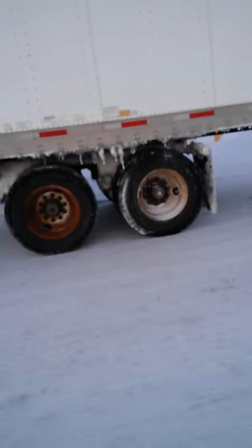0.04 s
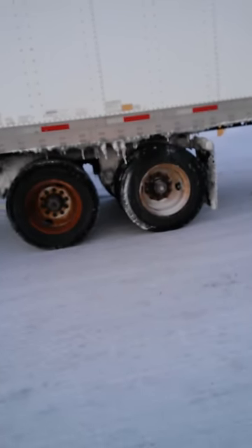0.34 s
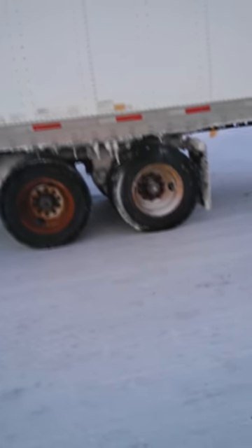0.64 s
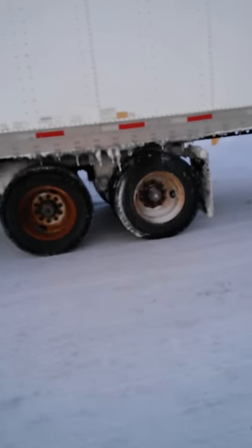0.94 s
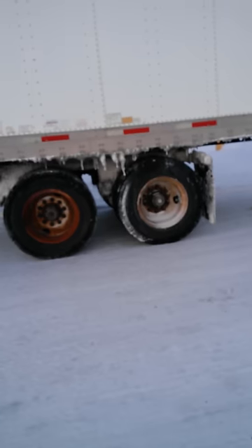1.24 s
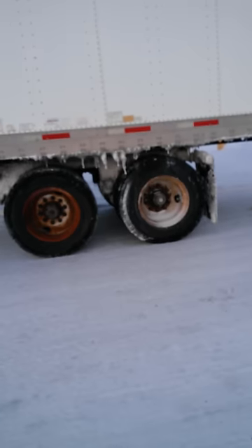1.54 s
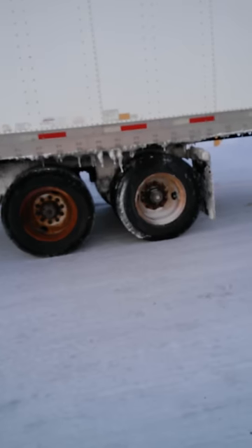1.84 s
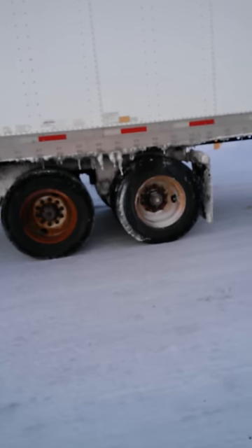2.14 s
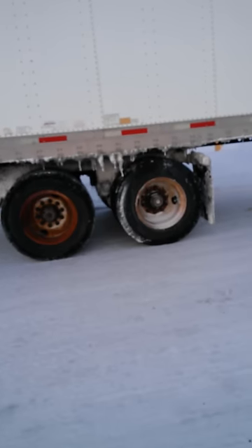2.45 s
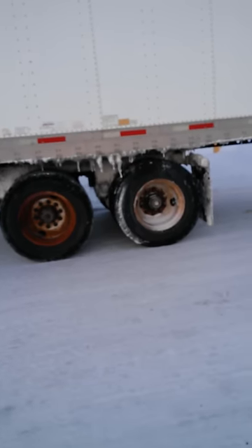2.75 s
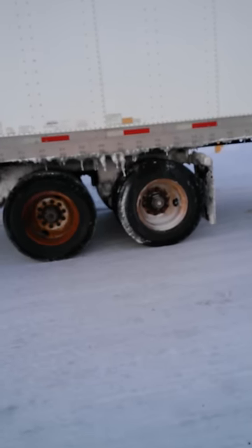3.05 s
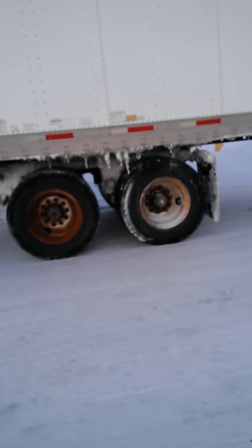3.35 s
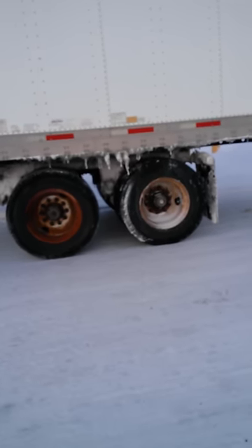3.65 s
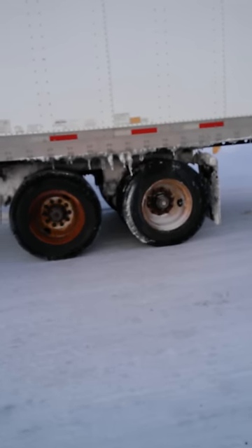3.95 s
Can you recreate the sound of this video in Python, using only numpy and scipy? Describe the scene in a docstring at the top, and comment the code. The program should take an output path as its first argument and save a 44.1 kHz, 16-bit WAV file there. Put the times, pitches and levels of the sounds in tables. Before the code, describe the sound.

Trailer tyres scrape and rumble slowly over packed snow, with a faint distant idle and a faint brake squeal. Wind buffets the microphone hard through the first second, mostly on the right. From 1 second, air hisses in swells, strongest around 2.4 to 3.1 seconds. The scraping dips, then builds, and a tyre slips twice at about 3.1 and 3.3 seconds. Gusts return from 3.4 seconds.

```python
"""A semi trailer creeps over packed snow. From the start its tyres scrape and rumble by friction, the
tractor idles far ahead and a dragging brake sings faintly. In the first second turbulent wind buffets
the two microphone ports, mostly the right, and the gain control ducks under the hardest gusts. From one
second on, a jet of air hisses in swells. Just after three seconds a tyre slips twice, shoving snow,
while the hiss changes colour; then the wind picks up again."""
import sys
import numpy as np
from scipy import signal
from scipy.fft import rfft, irfft
from scipy.io import wavfile

SR = 44100
rng = np.random.default_rng(int(sys.argv[2]) if len(sys.argv) > 2 else 0)


def store_pcm(level_fs):
    """Save levels as 16-bit WAV."""
    pcm = np.round(np.clip(level_fs, -1, 1) * 32767).astype(np.int16)
    wavfile.write(sys.argv[1], SR, np.atleast_2d(pcm).T)


N = 176400
T = np.arange(N) / SR
HZ = np.maximum(np.arange(N // 2 + 1) * SR / N, 1)


def from_db(db):
    """Amplitude ratio of a level in decibels."""
    return 10 ** (np.asarray(db) / 20)


def unit_rms(x):
    """Normalisation to unit mean power."""
    return x / np.sqrt(np.mean(x ** 2) + 1e-20)


def in_time(rows):
    """Linear interpolation of each column in time."""
    times, *columns = np.transpose(rows)
    return np.array([np.interp(T, times, column) for column in columns])


def per_hz(points):
    """Interpolation on a logarithmic frequency axis."""
    hz, value = np.transpose(points)
    return np.interp(np.log(HZ), np.log(hz), value)


def white():
    """Spectrum of Gaussian white noise."""
    return rfft(rng.standard_normal(N))


def drift(rate_hz):
    """Random fluctuation: low-pass noise of unit power."""
    return unit_rms(irfft(white() / (1 + (HZ / rate_hz) ** 2), N))


def butter(x, hz, kind, order=2):
    """Causal, maximally flat low- or high-pass filter."""
    sections = signal.butter(order, np.clip(hz, 10, .45 * SR), kind, fs=SR, output="sos")
    return signal.sosfilt(sections, x)


def tones(partials, waver):
    """Frequency modulation: sines of given RMS level wander by the fraction waver."""
    return sum(from_db(db) * np.sqrt(2) * np.sin(2 * np.pi * np.cumsum(hz * (1 + waver * drift(21.2))) / SR)
               for hz, db in partials)


# coherence between the ports: f/Hz, coherence (0 to 1)
COHERENCE = [(60, 0.67), (300, 1), (560, 0.98), (1000, 0.86), (2000, 0.48), (3500, 0), (8000, 0.1)]

def noise_field(spectrum_db, left_lead_s=.00012):
    """Partial coherence: noise reaches the two ports alike in the bass, unrelated in the treble."""
    coherence = np.clip(per_hz(COHERENCE), 0, 1)
    mid, side = np.sqrt(1 + coherence) * white(), np.sqrt(1 - coherence) * white()
    left = (mid + side) * np.exp(2j * np.pi * HZ * left_lead_s)
    return unit_rms(irfft(np.array([left, mid - side]) * from_db(spectrum_db), N))


# peaks and notches of the wheels and chassis: f/Hz, gain/dB
CHASSIS_MODES = [(1288, -12), (2107, -1), (2461, -1), (3125, 4.5), (3276, 4), (3679, 5), (4074, 8),
                 (8623, 9), (8896, -19), (9047, 4.5), (9374, 6)]

def chassis_resonance_db(half_width_hz=9.8):
    """Resonance: metal parts impose narrow peaks and notches on a spectrum."""
    return sum(db / (1 + ((HZ - hz) / half_width_hz) ** 2) for hz, db in CHASSIS_MODES)


# envelope of the scraping on snow: t/s, level/dB
SCRAPE_ENVELOPE = [(0, -36), (.25, -37.5), (.5, -39), (.8, -42), (1.0, -47), (1.25, -53.5), (1.5, -49.5),
                   (1.82, -50.5), (2.0, -46), (2.3, -38.5), (2.55, -35.5), (2.9, -33), (3.25, -31),
                   (3.4, -33.5), (3.5, -30.5), (3.7, -38.5), (3.82, -37), (4, -38)]
# slips that shove snow: t/s, decay time/s, level/dB
TYRE_SLIPS = [(3.063, 0.029, -21.5), (3.285, 0.064, -18)]
# spectral densities of scrape, rumble and slip: f/Hz, relative level/dB
SCRAPE_SPECTRUM = [(100, -30), (380, -9), (530, -1.5), (750, -9), (1200, -3), (2000, -3), (3500, -9),
                   (5000, -16), (8000, -18), (14500, -29)]
RUMBLE_SPECTRUM = [(15, -21), (30, -7), (55, -2), (110, 2), (180, -2), (250, -4), (350, -14.5),
                   (700, -23.5), (2000, -58)]
SLIP_SPECTRUM = [(100, -15), (380, -19), (530, 11), (800, -4), (1400, 2.5), (2100, 3), (2800, -0.5),
                 (4000, -2.5), (5600, -16.5), (6800, -12), (7600, -4.5), (8400, -16.5), (11000, -15),
                 (13000, -38)]

def tyres(grain_db=1.5, rumble_db=-30.5, rumble_follows=.99, slip_attack_s=.015, thud_db=-7.5):
    """Friction noise: a grainy scrape over a rumble that follows it; each slip surges with a thud."""
    level = in_time(SCRAPE_ENVELOPE)
    surge = sum(from_db(db) * np.clip((T - s) / slip_attack_s, 0, 1) * np.exp(-((T - s) / decay) ** 2)
                for s, decay, db in TYRE_SLIPS)
    scrape = noise_field(per_hz(SCRAPE_SPECTRUM) + chassis_resonance_db()) * from_db(level)
    slips = noise_field(per_hz(SLIP_SPECTRUM)) * surge
    grain = from_db(grain_db * drift(390))
    rolling = from_db(rumble_db + rumble_follows * (level - level.mean()))
    rumble = noise_field(per_hz(RUMBLE_SPECTRUM)) * (rolling + from_db(thud_db) * surge)
    return (scrape + slips) * grain + rumble


# partials of the idling engine: f/Hz, level/dB
ENGINE_PARTIALS = [(106, -50.5), (172, -48.5)]

def engine_idle():
    """Nearly periodic vibration: the distant engine hums in two low, wavering partials."""
    return tones(ENGINE_PARTIALS, waver=.0267)


# envelope of the brake squeal: t/s, level/dB
SQUEAL_ENVELOPE = [(0, -57.5), (.28, -53), (.45, -61), (1.0, -62), (1.5, -70), (4, -58)]
# its fundamental and octave: f/Hz, relative level/dB
SQUEAL_PARTIALS = [(4071, -1), (8142, -2)]

def brake_squeal(flicker_db=2.5):
    """Friction-excited vibration: a dragging brake sings faintly and unsteadily."""
    envelope = from_db(in_time(SQUEAL_ENVELOPE) + flicker_db * drift(20))
    return envelope * tones(SQUEAL_PARTIALS, waver=.00307)


# envelope of the wind on the ports: t/s, left level/dB, right level/dB
BREEZE_ENVELOPE = [(0, -26, -20.5), (.28, -32, -18.5), (.34, -30, -7), (.65, -26, -9.5), (.9, -24, -14),
                   (1.1, -47, -29), (1.3, -44, -42.5), (1.6, -65, -42), (1.85, -39, -42), (2.15, -52, -40),
                   (2.35, -32, -24), (2.6, -36, -28), (2.8, -25, -21.5), (3.2, -60, -41), (3.4, -24, -11.5),
                   (3.55, -48, -18.5), (3.7, -33, -24.5), (4, -37, -31)]
# spectral density of the wind: f/Hz, relative level/dB
BREEZE_SPECTRUM = [(15, -8), (30, -35), (60, 1.5), (120, 3.5), (200, 0), (330, -7.5), (600, -16.5),
                   (1200, -30), (2500, -44), (6000, -80)]

def breeze(lumps_db=3.5):
    """Turbulence: low, lumpy pressure fluctuations, independent at each port."""
    ports = []
    for level in in_time(BREEZE_ENVELOPE):
        pressure = irfft(white() * from_db(per_hz(BREEZE_SPECTRUM)), N)
        lumps = from_db(lumps_db * drift(27))
        ports.append(from_db(level) * unit_rms(pressure * lumps))
    return np.array(ports)


# gusts: t/s, half length/s, level/dB, characteristic f/Hz, port (0 left, 1 right)
PORT_GUSTS = [(0.031, .012, -10, 197, 1), (0.158, 0.011, -30, 300, 0), (0.175, 0.0058, -15.5, 320, 1),
              (0.221, 0.0046, -14, 281, 1), (0.264, 0.0077, -25, 300, 0), (0.299, .003, -14.5, 523, 1),
              (0.327, .008, -8, 189, 1), (0.347, .004, -4, 377, 1), (0.363, .004, -6, 450, 1),
              (0.398, .006, -6, 394, 1), (0.418, .005, -2, 467, 1), (.449, .004, 1, 690, 1),
              (0.473, 0.0074, 0, 160, 1), (0.497, .002, -1, 537, 1), (0.51, .003, -2, 490, 1),
              (0.537, 0.0022, -9, 650, 1), (0.546, 0.0033, -3, 181, 1), (0.581, 0.013, -6, 171.5, 1),
              (0.649, .007, -7.5, 292, 1), (0.681, .003, -16, 400, 1), (0.7, 0.0075, -25, 220, 0),
              (0.71, .004, -13.5, 347, 1), (0.73, 0.0032, -2.5, 756, 1), (0.735, .0015, 12.5, 1600, 1),
              (0.742, .008, 1.5, 307, 1), (0.759, .004, -4, 710, 1), (.788, .002, 1, 650, 1),
              (0.815, .004, -12, 555, 1), (0.831, 0.021, -11.5, 400, 0), (0.846, .002, -3.5, 444, 1),
              (0.857, .003, -9, 650, 1), (0.88, .004, -9, 470, 1), (.931, .003, -9.5, 550, 1),
              (0.941, .002, -8, 563, 1), (1.015, .002, -5.5, 605, 1), (1.023, .004, -3, 302, 1),
              (1.092, 0.0076, -26, 330, 0), (1.105, .004, -8, 420, 1), (1.151, .01, -34, 248, 0),
              (1.443, 0.027, -25, 182, 1), (1.455, .005, -20, 356, 1), (1.693, 0.0027, -24, 168, 1),
              (1.742, 0.0086, -19.5, 150, 1), (2.254, 0.011, -20, 232, 1), (2.3, 0.0067, -22, 240, 1),
              (2.343, 0.0045, -12.5, 308, 1), (2.711, 0.0087, -17, 294, 1), (2.749, 0.022, -12, 283, 1),
              (3.358, 0.016, -19, 244, 1), (3.416, .004, 1, 170, 1), (3.434, 0.0055, -2.5, 267.4, 1),
              (3.46, 0.0028, -5, 223, 1), (3.763, 0.015, -8.5, 125, 1), (3.79, .007, -8, 274, 1),
              (3.806, .006, -4, 229, 1), (3.823, .005, -7, 348, 1), (3.877, 0.011, -18, 228, 1)]

def gusts(eddies_per_cycle=4.5, core_size=3, knee_ratio=.49, top_ratio=2.66, low_cut_hz=68.6):
    """Shot noise: a run of eddies knocks on one port around a large core; faster runs are brighter."""
    out = np.zeros((2, N))
    sizes, chance = rng.standard_normal(N), rng.random(N)
    for s, half, db, hz, port in PORT_GUSTS:
        near = np.abs(T - s) < 4 * half + .02
        envelope = np.exp(-.5 * ((T[near] - s) / half) ** 2)
        eddies = sizes[near] * envelope * (chance[near] < eddies_per_cycle * hz / SR)
        eddies[np.argmax(envelope)] = core_size * np.sign(sizes[near][0])
        knock = butter(eddies, hz * knee_ratio, "low", order=1)
        knock = butter(knock, hz * top_ratio, "low", order=4)
        knock = butter(knock, low_cut_hz, "high")
        out[int(port), near] += from_db(db) * unit_rms(knock) * np.sqrt(np.mean(envelope ** 2))
    return out


# envelope of the air jet: t/s, level/dB
HISS_ENVELOPE = [(0, -49.5), (.28, -46.5), (.4, -48), (.93, -46), (1.0, -39), (1.07, -29), (1.16, -37),
                 (1.31, -37), (1.44, -51.5), (1.82, -63.5), (1.88, -46.5), (1.95, -29), (2.02, -29),
                 (2.08, -35), (2.16, -37), (2.25, -44), (2.32, -39), (2.41, -27.5), (2.65, -25.5),
                 (2.77, -28.5), (2.83, -22), (2.96, -28), (3.055, -28.5), (3.08, -27.5), (3.115, -28.5),
                 (3.35, -33), (3.55, -30), (3.75, -40.5), (4, -39.5)]
# its spectral density: f/Hz, relative level/dB
HISS_SPECTRUM = [(200, -16), (520, -5), (900, -17), (2000, -5.5), (3000, -3.5), (4000, -1), (5000, -4),
                 (7000, -5), (9200, -1.5), (11300, -7.5), (14300, -3.5)]
# its change of colour as the trailer moves on: f/Hz, gain/dB
HISS_COLOUR_SHIFT = [(1000, 9), (3000, -3), (4200, -1.5), (5300, 7.5), (6600, -0.5), (7600, 3.5),
                     (8800, -4), (9700, 1), (11400, 8), (13000, 0), (14500, 0.5)]

def air_hiss(flutter_db=1.18, shift_from_s=2.9, shift_to_s=3.54):
    """Jet noise: a bright hiss swells and fades, passing at constant power to a second colour."""
    early = per_hz(HISS_SPECTRUM) + chassis_resonance_db()
    late = early + per_hz(HISS_COLOUR_SHIFT)
    moved = np.clip((T - shift_from_s) / (shift_to_s - shift_from_s), 0, 1)
    jet = np.sqrt(1 - moved) * noise_field(early) + np.sqrt(moved) * noise_field(late)
    return jet * from_db(in_time(HISS_ENVELOPE) + flutter_db * drift(17))


# frequency response of each microphone port: f/Hz, gain/dB
LEFT_RESPONSE = [(300, -2.5), (800, 5), (1400, -2.5), (2500, 0.5), (4400, 4.5), (5000, 0.5), (5800, -4),
                 (7500, -11), (9300, -20), (10700, -46), (12000, -26), (13000, -10), (14400, -7.5)]
RIGHT_RESPONSE = [(300, 2), (800, 3.5), (1500, 0.5), (2500, -1), (4200, -2), (5500, 1.5), (7000, 2.5),
                  (8000, 6), (9100, 12.5), (10000, 11.5), (12000, 5.5), (14400, -4)]

def scene():
    """Superposition: the truck's sounds, filtered by the two ports, add to the wind."""
    truck = tyres() + engine_idle() + brake_squeal() + air_hiss()
    ports = from_db([per_hz(LEFT_RESPONSE), per_hz(RIGHT_RESPONSE)])
    return irfft(rfft(truck) * ports, N) + breeze() + gusts()


def smooth(x, seconds):
    """Exponential averaging by a first-order lag."""
    pole = np.exp(-1 / (seconds * SR))
    return signal.lfilter([1 - pole], [1, -pole], x)


THRESHOLD_DB, REDUCTION_DB_PER_DB, RELEASE_DB_PER_S = -11, .72, 33.5
DETECT_S, ATTACK_S, CUTOFF_HZ = .01, .0012, 14500

def record(dry):
    """Compression: one gain ducks both channels; saturation rounds the peaks and a low-pass follows."""
    level_db = 10 * np.log10(smooth(np.max(dry ** 2, axis=0), DETECT_S) + 1e-12)
    reduction_db = REDUCTION_DB_PER_DB * np.maximum(level_db - THRESHOLD_DB, 0)
    release_db = RELEASE_DB_PER_S * T
    held_db = np.maximum.accumulate(reduction_db + release_db) - release_db  # recovers at a steady rate
    ducked = dry * from_db(-smooth(held_db, ATTACK_S))
    rounded = ducked / (1 + ducked ** 4) ** .25
    return irfft(rfft(rounded) / np.sqrt(1 + (HZ / CUTOFF_HZ) ** 400), N)


dry = scene()
out = record(dry)
store_pcm(out)
```